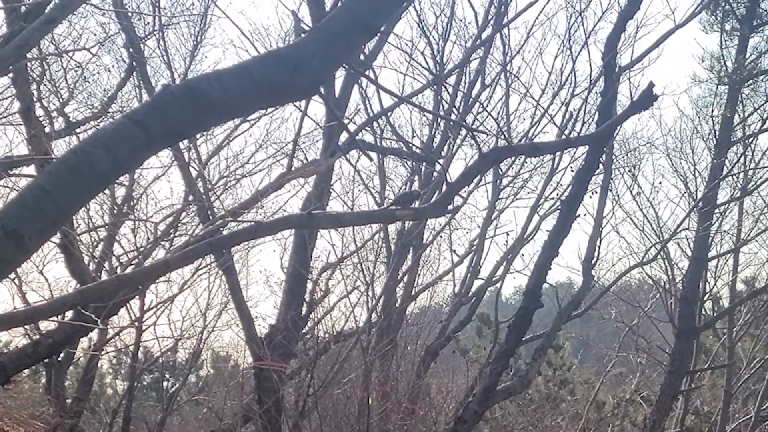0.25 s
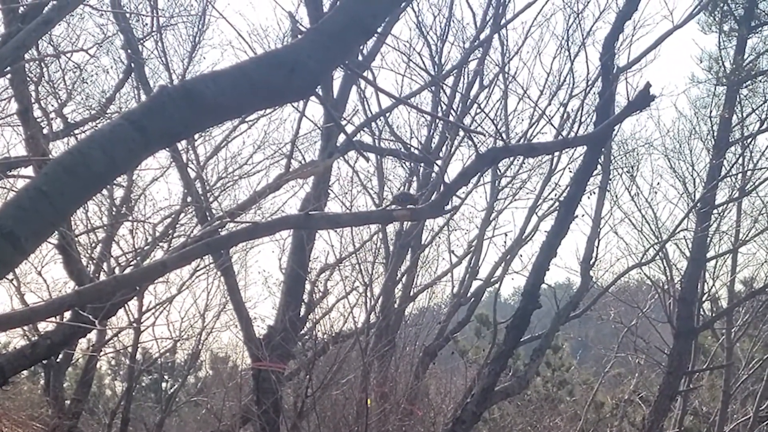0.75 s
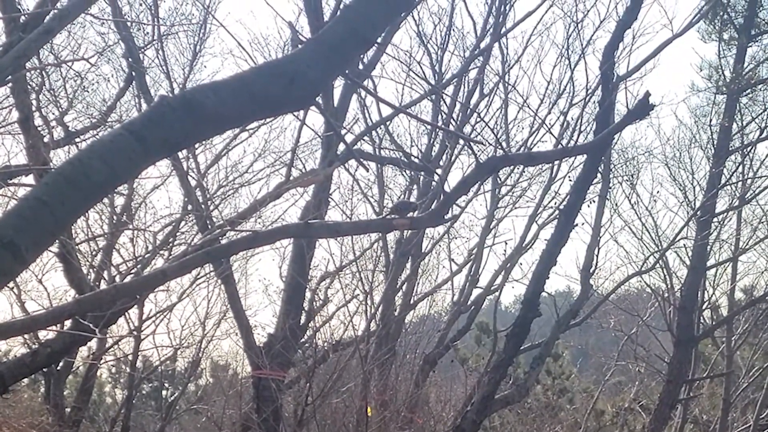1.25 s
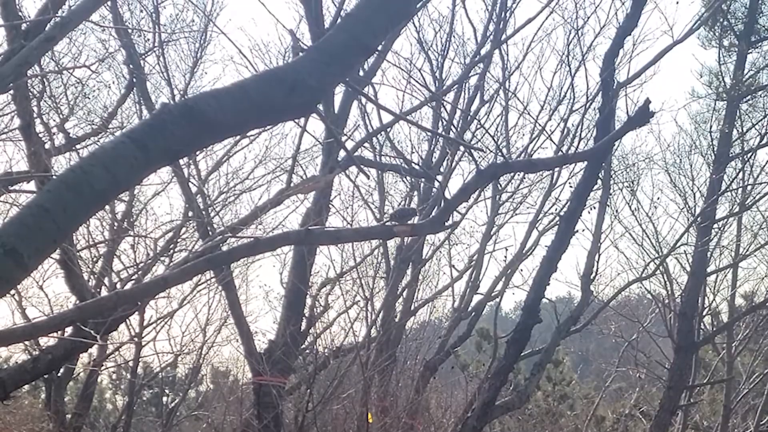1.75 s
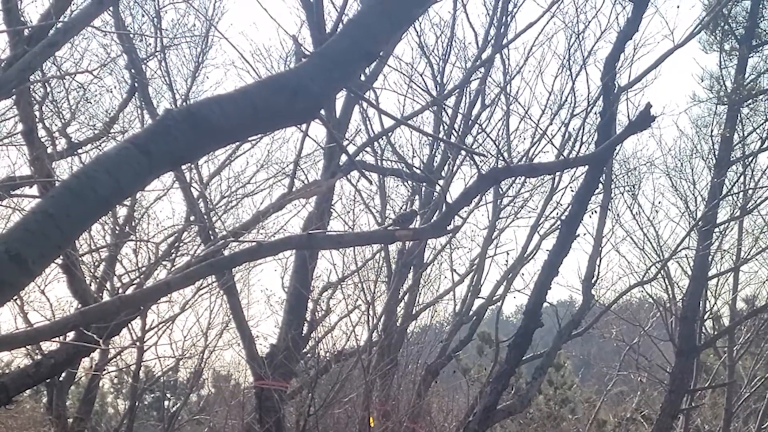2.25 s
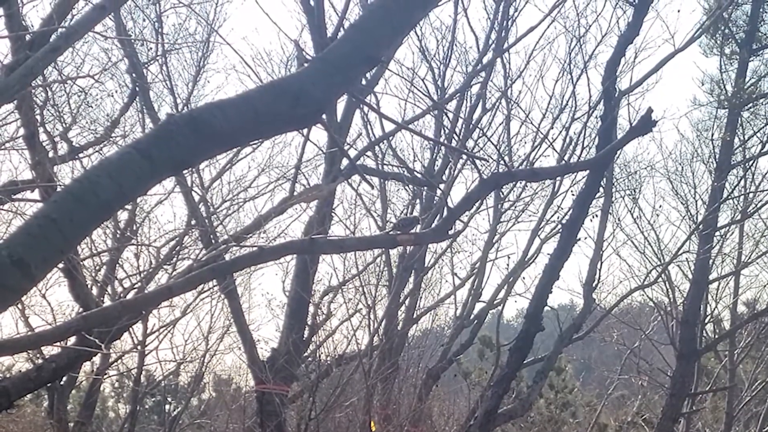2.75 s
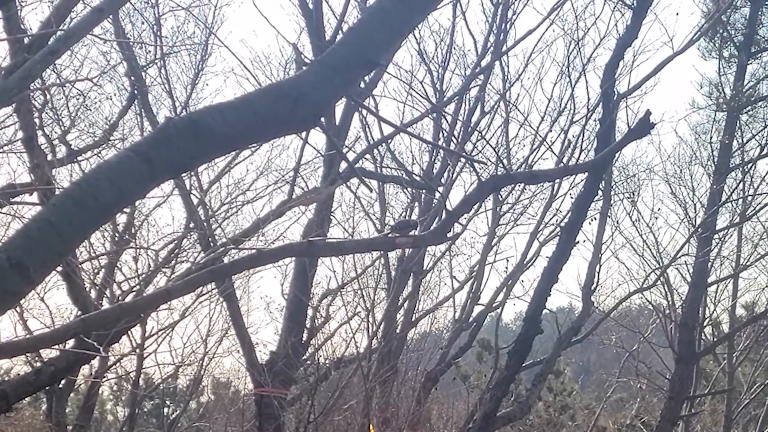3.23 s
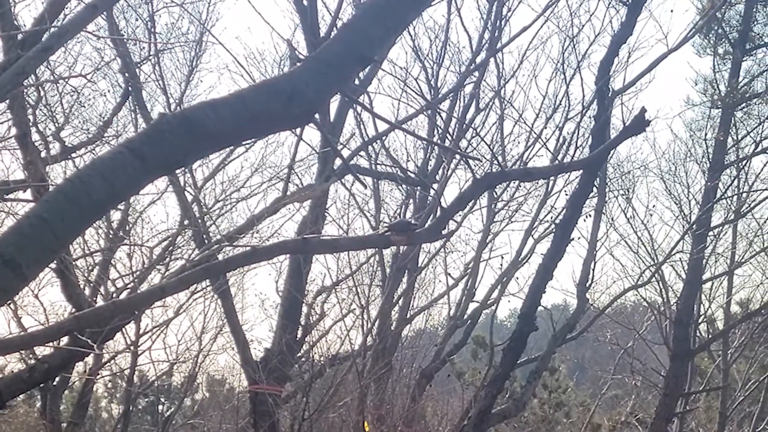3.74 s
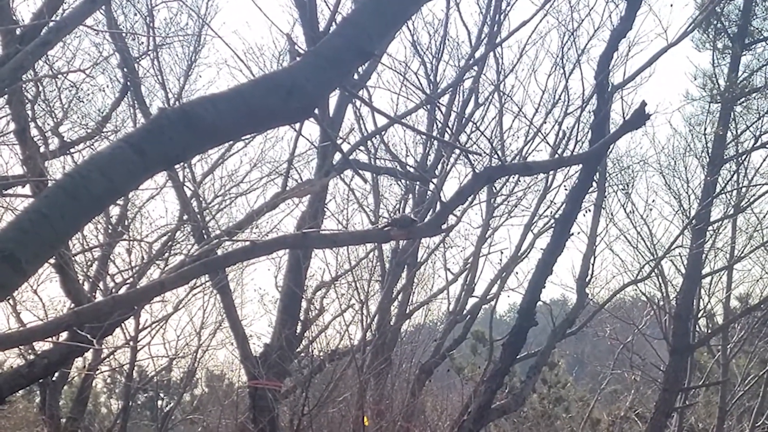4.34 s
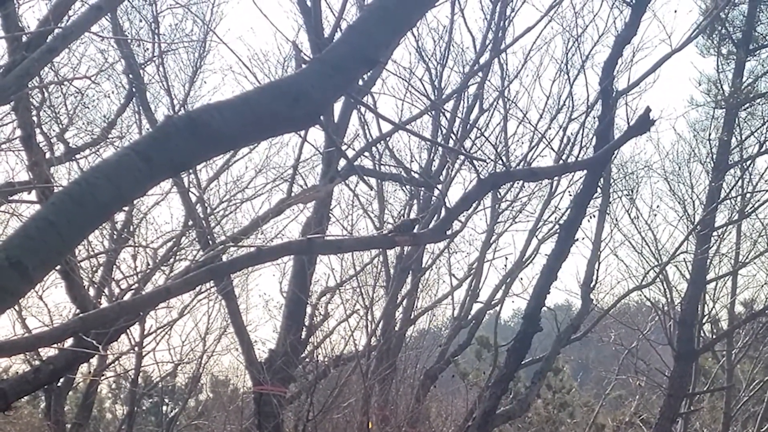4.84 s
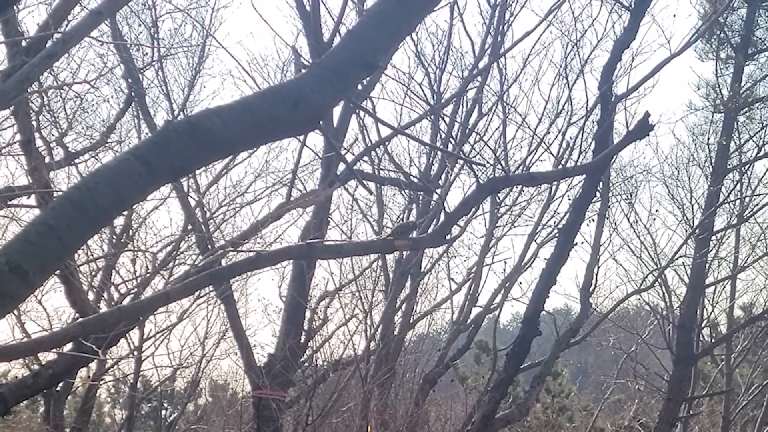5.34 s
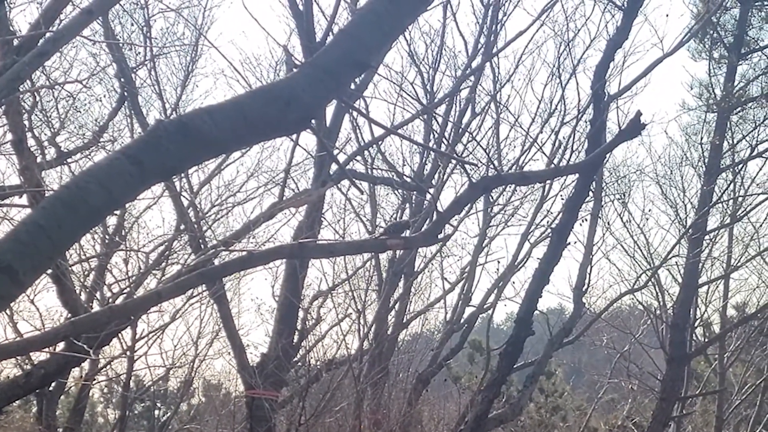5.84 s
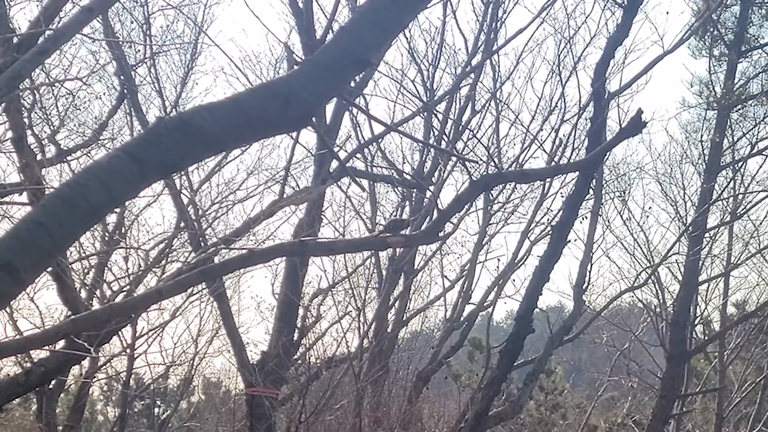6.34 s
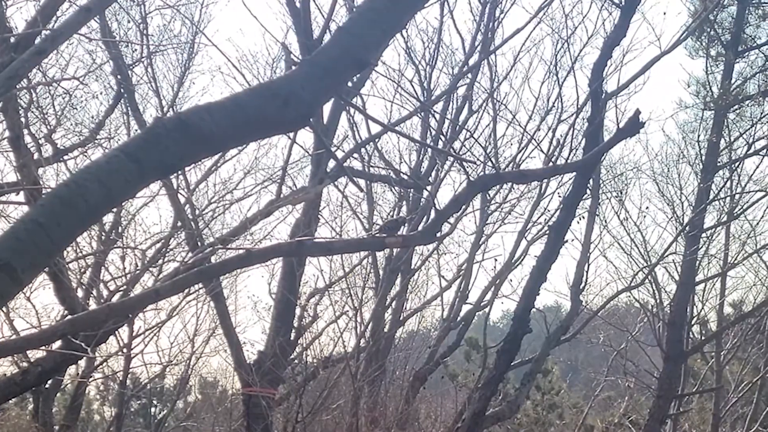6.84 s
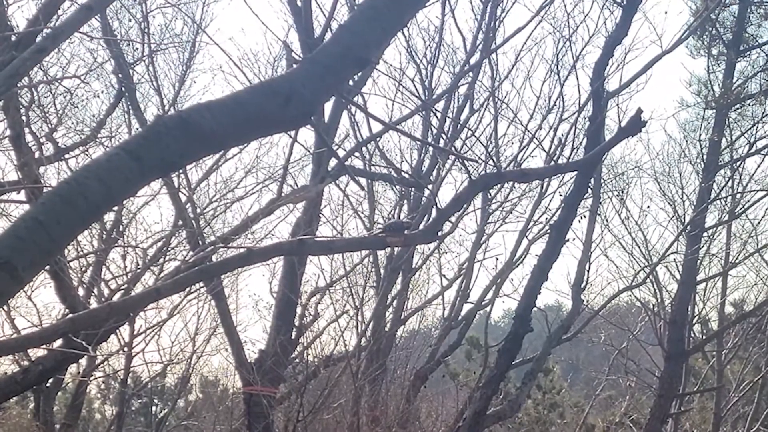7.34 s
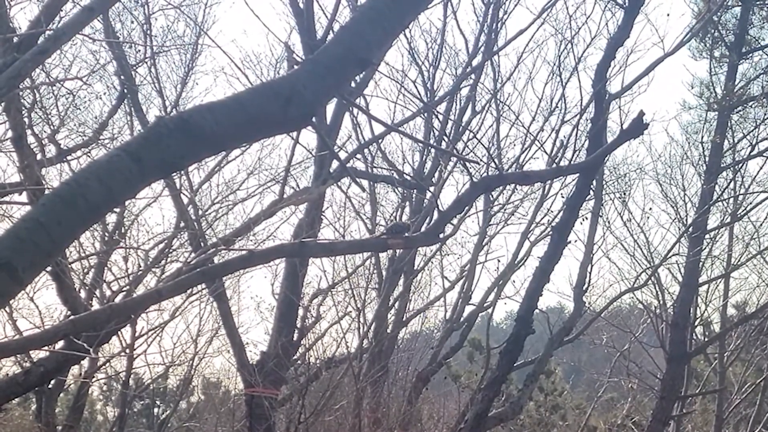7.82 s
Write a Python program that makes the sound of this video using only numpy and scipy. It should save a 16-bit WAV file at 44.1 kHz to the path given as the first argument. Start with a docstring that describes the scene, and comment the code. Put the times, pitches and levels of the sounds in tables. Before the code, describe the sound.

Short runs of dry, sharp woodpecker pecks echo lightly through a forest over a soft hush and wind buffeting.

```python
"""A small woodpecker on a thin dead branch in bare forest, pecking in short bouts of about eight
blows a second. Each blow clicks the beak and knocks the wood; a close limb, twigs and trunks echo
it, within the forest's longer, diffuse ring. A small bird gives one faint, falling chirp. Wind
rumbles on the two ports of the microphone, over the hush of the far landscape and a thin hiss."""
import sys
import numpy as np
from scipy import signal
from scipy.fft import rfft, irfft, next_fast_len
from scipy.io import wavfile
from scipy.ndimage import map_coordinates

SR = 44100
rng = np.random.default_rng(int(sys.argv[2]) if len(sys.argv) > 2 else 0)


def inscribe(sig):
    """Save sig as 16-bit PCM at rate SR to the path in sys.argv[1].

    A 1-D sig is mono; a 2-D sig holds one channel per row.
    Samples are clipped to [-1, 1] before scaling.
    """
    pcm = np.round(np.clip(np.atleast_2d(sig).T, -1, 1) * 32767)
    wavfile.write(sys.argv[1], SR, pcm.astype(np.int16))


N = 356328

# how long the forest rings: (frequency [Hz], t60 [s])
FOREST_DECAY = [(1000, 0.14), (4000, 0.26), (7000, 0.21), (14000, 0.19)]
# where the wood's sound sits in the stereo image: (frequency [Hz], left minus right [dB])
WOOD_BALANCE = [(1200, 6.5), (1800, -2), (2600, -5), (3200, -8.5), (3750, 11.5), (4600, -7), (5400, -2.5),
                (6200, -.5), (7600, 5), (9700, -9), (10900, -5.5), (12000, -2.5)]


def woodpecker():
    """Blows ring and crack; a close limb, twigs and trunks echo each within the forest's longer ring."""
    # blows: (time [s], strength [dB], deep knock [dB], upper knock [dB], hollow clack [dB],
    # sharp bite [dB], top snap of the beak [dB])
    pecks = [(0.151, -10.5, 8, 9, -2.5, -9.5, -36), (0.173, -44, 2, 2, 0, -2, 18),
             (0.2644, -6.5, 11, 9, 5.5, 2, -1), (0.5682, -4.5, 7, 6, 4, -2.5, -4),
             (0.6933, -1.5, 4.5, 7, 3.5, -3.5, -6), (0.8199, 1.5, 4, 4, 2.5, -2.5, -10),
             (1.1992, -12, 11.5, 2.5, 3.5, -7, -12), (1.3072, .5, 0.5, 1.5, -3, -5, -7),
             (1.4335, -.5, 3, 0.5, -1.5, -3, -6), (1.6708, -9, 8.5, 3.5, 7, 0, -4.5),
             (1.775, -11.5, -4, 3, 3, -0.5, 1), (3.7166, -10, 5, 4, 2.5, 2.5, -6),
             (3.8174, -4, 2, 5, 3.5, 1.5, -6), (3.922, -9, 1, 5, 0, 7.5, -2.5),
             (4.188, -10, 7, 4.5, 4.5, 3.5, -5), (4.2884, -6, 4.5, -4, 5, 1, -6.5),
             (4.3957, -5, -.5, 7.5, 2, -1, -10), (4.619, -30.5, 3, 20, 13, 2, 6),
             (4.729, -27.5, 13, 10, 9, 9.5, -8), (5, -19.5, 15, 9, 7, -7, -26),
             (5.101, -4.5, 9.5, 6.5, 4.5, 0.5, -7), (5.2278, -4.5, -5.5, 4, 3.5, 7.5, -3),
             (5.472, -11.5, 13, 8.5, 4.5, 3, -7), (5.5813, -3.5, -3, 3.5, 2, 6, 3.5),
             (5.6902, -17.5, 2, 3, 7, 3, -6), (5.7938, -29.5, 2, 7, 4, -2, -14),
             (6.077, -19.5, 12, 8, 10.5, -2, 5), (6.1757, -15.5, 15, 9, 11, 1, 0),
             (6.28, -5, 9.5, 5.5, 3.5, 2.5, -7), (6.3947, -5, 8, 4.5, 2.5, 0, -9),
             (6.674, -2.5, -10, -5, 0, 5, 2), (6.981, -17, 13, 12.5, 7, -1, 7.5),
             (7.0851, -6.5, 8, 1.5, 0.5, 0.5, -7), (7.195, -2, -3, 0, 6.5, 0.5, 0),
             (7.437, -23, 5, 6.5, -3, -1, 5), (7.5259, -6, -10, -9, -2.5, -3, 0),
             (7.695, -36, 13, 19, 11, 0, -6)]
    # spots of the branch, worked in turn: (start [s], bright tick [dB], t60 of the notes [s],
    # notes as (frequency [Hz], relative level [dB]))
    spots = [(0, 2, 0.03, [(2780, -5.5), (3520, -15), (4000, -14), (4400, -13), (6130, -12), (7160, -11)]),
             (0.62, 5, 0.033, [(2775, -8), (3400, -13), (3735, -17), (4335, -3.5), (6070, -21), (6450, -13),
             (7150, -18)]), (1.1, 2, 0.023, [(2775, -5.5), (3050, -6), (3500, -10), (3810, -4), (4250, -12),
             (4970, -22), (7150, -15)]), (3.5, -2, 0.029, [(1750, -5.5), (1890, -10), (2290, 0.5),
             (2790, -32), (3080, -6), (4380, -26), (5300, -13)]), (4.9, 2, 0.041, [(2300, -14), (2550, -6),
             (2790, -13), (4390, -12), (4530, -3), (5800, -31), (6870, -17)]), (6.23, 1, 0.027, [(2290, -5),
             (2780, -21), (2955, -9), (3830, -22), (4200, -7), (5150, -8)]), (6.6, 4.5, 0.023, [(2580, -3),
             (3700, -17), (4470, -2), (5830, -19), (6660, -7)]), (6.9, -1, 0.013, [(2330, -3), (2546, -2),
             (3040, -1), (3420, -12), (4300, -11)])]
    t = np.arange(SR // 4) / SR
    out = np.zeros((2, N + SR))
    for start, db, knock_db, upper_db, clack_db, bite_db, snap_db in pecks:
        _, tick_db, note_t60, notes = spots[sum(start >= row[0] for row in spots[1:])]
        blow = amp(-40.5) * branch_ring(t) + amp(-7.5) * beak_crack(t)
        blow += amp(-27.5) * spot_notes(t, notes, note_t60)
        limb = amp(-13) * delayed(blow, np.array([[.0073], [.00735]]))
        twigs = amp(-12) * diffuse_echo(t, [(1000, .025), (10000, .025)], start=.0055, rise=.0005)
        trunk_decay = [(1000, .086), (4000, .083), (10000, .11)]
        trunks = amp(-16) * diffuse_echo(t, trunk_decay, start=.012, rise=.0016)
        scattered = signal.fftconvolve(blow, twigs + trunks, axes=1)[:, :len(t)]
        echoes = coloured(limb + scattered, [(7000, 1.0), (10000, -0.69)])
        forest = amp(-16.5) * forest_ring(t)
        colour = [(750, -2), (1000, knock_db), (1280, knock_db), (1550, upper_db), (1800, upper_db),
                  (2100, clack_db), (2500, clack_db), (3300, 0), (4400, 1), (6200, bite_db),
                  (9800, tick_db + 0.31 * snap_db), (13000, snap_db)]  # the tick follows the snap
        peck = amp(db) * coloured(at_ports(blow) + echoes + forest, colour)
        out[:, round(start * SR):][:, :len(t)] += peck
    return out[:, :N]


def beak_crack(t):
    """The beak lands dully, then bites: the fibres splinter a moment later, in uneven spurts."""
    # the beak crushing wood fibres: (frequency [Hz], gain [dB])
    crack_colour = [(300, -47.5), (850, -3.5), (1350, 2), (1800, -8), (2030, -8), (2300, 7.5), (2750, 6),
                    (3050, 6.5), (3260, 4.5), (3480, 8), (3800, 6), (4450, 9.5), (4700, 2.5), (5000, 3),
                    (5600, 3.5), (5850, 4.5), (6400, 5), (7100, -5.5), (7600, -6.5), (8600, -7.5),
                    (9900, 2), (11600, -2), (13500, -3.5), (15000, -10), (16500, -19)]
    splinter_db, splinters_per_s = 3, 2220
    impact = burst(t, t60=0.02, rise=0.00066, apart=0.24)
    landing = filtered(impact, lambda hz: 1 / (1 + 1j * hz / 4000) ** 2)
    spurts = np.interp(t * splinters_per_s, np.arange(len(t)), rng.standard_normal(len(t)))
    fibres = amp(splinter_db * spurts) * burst(t, t60=.0105, rise=.002, apart=.65)
    fibres /= np.linalg.norm(fibres[0])
    bite = coloured(delayed(fibres, seconds=.0006), [(2000, -1.5), (6000, 0)])
    crack = coloured(amp(-4.5) * landing + bite, crack_colour)
    return filtered(crack, lambda hz: ears(along(WOOD_BALANCE, hz)))


def branch_ring(t, scatter_db=1.93):
    """The branch rings in its bending modes; each blow weights them anew."""
    # bending modes: (frequency [Hz], relative level [dB], t60 [s], left minus right [dB])
    modes = [(978, -12, 0.035, 5), (1122, -3, 0.026, 11), (1234, 8.5, 0.021, 4.5), (1380, 2, 0.026, 10),
             (1430, 2, 0.038, -3), (1616, 3, 0.035, 0.5), (1785, -5.5, 0.039, -8), (1863, -15, 0.018, -4),
             (2194, -12, 0.038, -4), (2517, -14, 0.073, -1), (2780, -14.5, 0.037, -10),
             (3760, -13, 0.036, 19), (6390, -9, 0.032, 16), (10500, -15, 0.0094, 2)]
    out = np.zeros((2, len(t)))
    for (hz, db, t60, pan_db), chance in zip(modes, rng.standard_normal(len(modes))):
        swing = ears(pan_db) * amp(db + scatter_db * chance - 60 * t / t60) * np.sin(2 * np.pi * hz * t)
        out = swing - out  # neighbouring modes swing opposite ways
    return out


def spot_notes(t, notes, t60, rise_s=0.00054, scatter_db=2):
    """The patch of wood under the beak gives a few brief notes, a little different at every blow."""
    out = np.zeros((2, len(t)))
    for (hz, db), chance in zip(notes, rng.standard_normal(len(notes))):
        swing = ears(along(WOOD_BALANCE, hz)) * amp(db + scatter_db * chance) * np.sin(2 * np.pi * hz * t)
        out = swing - out
    return out * amp(-60 * t / t60) * (1 - np.exp(-t / rise_s))


def at_ports(x, lag_s=0.00013, shade_hz=5940, detour_s=0.001007):
    """The microphone's right port hears the blow late; its treble, in shadow, comes a longer way."""
    turns = lambda hz: hz * lag_s + np.maximum(hz - shade_hz, 0) * detour_s
    return np.array([x[0], filtered(x[1], lambda hz: np.exp(-2j * np.pi * turns(hz)))])


def forest_ring(t):
    """The forest rings diffusely almost from the blow's start; countless paths smear the modes away."""
    # the forest's answer to an average blow: (frequency [Hz], gain [dB])
    tail_colour = [(400, -22), (900, 3), (1300, -1), (1950, 4.5), (2700, 7), (4300, 3), (5400, -6.5),
                   (6600, 4), (8200, -1), (10000, -6), (13000, -1), (15200, -9), (16500, -40)]
    return coloured(diffuse_echo(t, FOREST_DECAY, start=0.0022, rise=0.0003), tail_colour)


def diffuse_echo(t, t60s, start, rise):
    """Scattered sound in stereo, energy 1 on the left, building up from start seconds on."""
    hz, when, noise = signal.stft(rng.standard_normal((2, len(t))), SR, nperseg=256)
    decay = amp(-60 * when / along(t60s, hz)[:, None])
    tail = signal.istft(noise * decay, SR, nperseg=256)[1][:, :len(t)]
    tail *= 1 - np.exp(-np.maximum(t - start, 0) / rise)
    return tail / np.linalg.norm(tail[0])


def chirp():
    """One faint, falling chirp from a small bird, with the forest's echo."""
    # the bird's glide: (time [s], pitch [Hz], level [dB])
    glide = [(1.62, 3300, -99), (1.64, 3230, -72), (1.667, 3150, -73), (1.678, 2630, -47),
             (1.697, 2460, -55), (1.712, 2250, -77)]
    hz, db = curves(glide)
    t = np.arange(N) / SR
    sounding = (t > glide[0][0]) & (t < glide[-1][0])
    note = (sounding * amp(db) * np.sin(2 * np.pi * np.cumsum(hz) / SR))[None]
    echo = diffuse_echo(t[:SR // 3], FOREST_DECAY, start=0.0039, rise=0.0018)
    return note + amp(-11) * signal.fftconvolve(note, echo, axes=1)[:, :N]


def wind():
    """Right at the microphone, one flow presses on the ports, buffets them and sheds small eddies."""
    # deep pressure swells, buffeting and eddies, each: (frequency [Hz], relative density [dB])
    swell_spectrum = [(10, -35), (22, -30), (35, -9), (48, -9), (65, -1.5), (78, -9), (100, -19),
                      (200, -120)]
    buffet_spectrum = [(30, -79), (65, -6.5), (82, 6.5), (100, 1), (135, -3.5), (170, -11.5), (230, -50),
                       (400, -120)]
    eddy_spectrum = [(50, -71), (110, -6), (155, 0), (200, 1), (280, -7), (400, -17.5), (700, -41),
                     (1500, -90), (4000, -120)]
    light_breeze_db, flutter_db = -45, 1.5
    flow_db, swell_db, eddy_db = airflow()
    excess_db = flow_db - light_breeze_db + flutter_db * wobble(rate=13)  # turbulence in the flow
    likeness = [(30, .42), (100, .58), (250, .58)]
    swells = amp(4 + excess_db + swell_db) * rush(swell_spectrum, likeness)
    buffet = amp(excess_db) * rush(buffet_spectrum, likeness)
    eddies = amp(-3 + 0.72 * excess_db + eddy_db) * rush(eddy_spectrum, likeness)  # these grow more slowly
    return amp(light_breeze_db) * (swells + buffet + eddies)


def airflow():
    """The wind's strength, swell and eddy content in dB: bell-shaped gusts add power to the breeze."""
    # the breeze between gusts: (time [s], level [dB])
    breeze = [(0, -45.5), (1.5, -46), (2.9, -47), (4.9, -46), (5.4, -52.5), (6.3, -47), (7.55, -51),
              (8.08, -43.5)]
    # gusts: (peak time [s], half length [s], level [dB], extra deep swell [dB], extra eddies [dB])
    gusts = [(0.038, 0.0095, -29, 5.5, 2.5), (0.163, 0.065, -43.5, 9, -3), (0.558, 0.16, -40, -0.5, -4.5),
             (0.99, 0.14, -45.5, -0.5, -1), (2.063, 0.12, -55, 15, 7), (3.434, 0.11, -43.5, 4.5, -4),
             (3.965, 0.017, -35, -5, -18), (5.038, 0.0068, -32.5, 1.5, 0.5), (5.198, 0.094, -37, -5.5, -11),
             (5.65, 0.071, -33.5, -3.5, -4.5), (6.007, 0.018, -44, 8, -6.5), (6.165, 0.022, -41.5, 9, -6),
             (6.425, 0.041, -39, 0.5, -2.5), (6.633, 0.022, -25.5, -17, 1), (6.701, 0.023, -35.5, -2, 0.5),
             (6.863, 0.061, -36.5, -0.5, 2), (7.024, 0.039, -31, -8, -0.5), (7.152, 0.03, -23.5, -19, -3.5),
             (7.247, 0.03, -30, -14, -12.5), (7.924, 0.26, -44.5, -1.5, -7)]
    t = np.arange(N) / SR
    power, swell, eddy = amp(curves(breeze)[0]) ** 2, 0, 0
    for peak_s, half_s, db, swell_db, eddy_db in gusts:
        gust = amp(db) ** 2 * np.exp(-((t - peak_s) / half_s) ** 2)
        power += gust
        swell += swell_db * gust
        eddy += eddy_db * gust
    return 10 * np.log10(power), swell / power, eddy / power


def hush():
    """The dull wash of the far landscape with one brief swell, and a thin hiss that sinks, then grows."""
    # the far wash, its swell and the high hiss, each: (frequency [Hz], relative density [dB])
    wash_spectrum = [(100, -4.5), (280, 0.5), (450, -5), (700, -9), (1100, -16), (1600, -18.5),
                     (2200, -27.5), (3500, -32), (5500, -42.5), (8000, -51.5), (11500, -46.5), (14500, -77)]
    swell_spectrum = [(350, -26), (600, -8), (950, 9), (1200, -9), (1800, -40)]
    hiss_spectrum = [(5000, -39), (6700, -15), (7800, -8.5), (8600, -16.5), (11000, -23.5)]
    # slow drift of the wash and of the hiss, each: (time [s], relative level [dB])
    wash_drift = [(0, -47.5), (2.3, -48.5), (4.3, -48), (5.3, -49.5), (8.08, -48)]
    hiss_drift = [(0, -68), (3.3, -73), (5.2, -68), (8.08, -65)]
    # how alike the two ports hear the wash: (frequency [Hz], correlation [-1 to 1])
    likeness = [(60, 0.79), (130, 0.99), (290, 1), (640, 0.56), (1410, -0.43), (3100, 0.0034),
                (6820, -0.064), (15000, -0.034)]
    swell_at_s, swell_width_s = 7.67, 0.037
    wash = amp(curves(wash_drift)[0]) * ears(-4) * rush(wash_spectrum, likeness)
    hiss = amp(curves(hiss_drift)[0] - 9) * rush(hiss_spectrum, [(8000, 0.065)])
    bell = np.exp(-((np.arange(N) / SR - swell_at_s) / swell_width_s) ** 2 / 2)
    return wash + hiss + amp(-56.5) * bell * rush(swell_spectrum, likeness)


def burst(t, t60, rise, apart):
    """A stereo noise burst, energy 1 on the left; apart weights what differs between the ports."""
    both, left, right = rng.standard_normal((3, len(t)))
    x = (both + apart * np.array([left, right])) * amp(-60 * t / t60) * (1 - np.exp(-t / rise))
    return x / np.linalg.norm(x[0])


def rush(spectrum, likeness):
    """Stereo noise of rms 1 from (Hz, dB) points and (Hz, left-right correlation) points."""
    def mid_side_gains(hz):
        turn = np.arccos(np.clip(along(likeness, hz), -1, 1)) / 2
        return amp(along(spectrum, hz)) * [np.cos(turn), np.sin(turn)]
    mid, side = filtered(rng.standard_normal((2, N)), mid_side_gains)
    noise = np.array([mid + side, mid - side])
    return noise / np.sqrt(np.mean(noise ** 2) + 1e-20)


def wobble(rate):
    """A smooth random curve, rate knots a second."""
    return map_coordinates(rng.standard_normal(int(N * rate / SR) + 4), [np.arange(N) * rate / SR])


def amp(db):
    """Decibels to gain."""
    return 10 ** (np.asarray(db) / 20)


def ears(pan_db):
    """Left and right gains for a level difference."""
    return amp(np.array([[.5], [-.5]]) * pan_db)


def along(points, hz):
    """(Hz, value) points read on a log axis."""
    knots_hz, values = np.transpose(points)
    return np.interp(np.log(hz + 1), np.log(knots_hz + 1), values)


def curves(rows):
    """One value per sample for each column after the time."""
    times, *columns = np.transpose(rows)
    return [np.interp(np.arange(N) / SR, times, column) for column in columns]


def filtered(x, response):
    """x through a complex frequency response."""
    n = x.shape[-1]
    padded = next_fast_len(n + 4096, real=True)
    return irfft(rfft(x, padded) * response(np.fft.rfftfreq(padded, 1 / SR)), padded)[..., :n]


def coloured(x, points):
    """Causal (minimum-phase) colouring by (Hz, dB) points, which keeps attacks sharp."""
    cepstrum = irfft(np.log(amp(along(points, np.linspace(0, SR / 2, 513)))))
    half = len(cepstrum) // 2
    folded = np.concatenate([cepstrum[:1], 2 * cepstrum[1:half], np.zeros(half)])
    impulse = irfft(np.exp(rfft(folded)))
    return signal.fftconvolve(x, impulse[None], axes=1)[:, :x.shape[1]]


def delayed(x, seconds):
    """x later by a time, which may differ between the channels."""
    return filtered(x, lambda hz: np.exp(-2j * np.pi * hz * seconds))


def scene():
    """Both birds in the windy wood, heard from one microphone position."""
    return woodpecker() + chirp() + wind() + hush()


def record(dry):
    """The camera keeps nothing above its band limit."""
    top_hz = 16200
    return filtered(dry, lambda hz: 1 / np.sqrt(1 + (hz / top_hz) ** 160))


dry = scene()
out = record(dry)
inscribe(out)
```